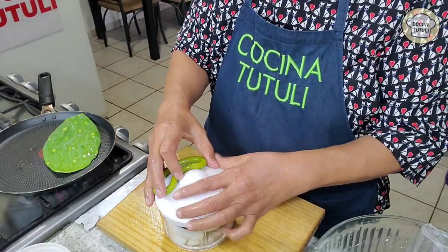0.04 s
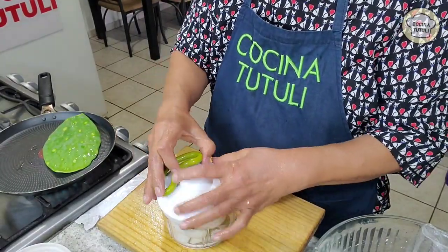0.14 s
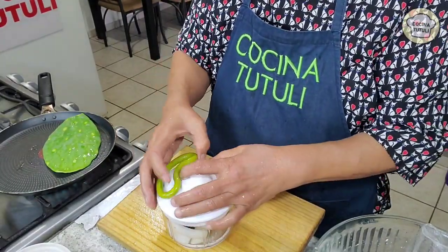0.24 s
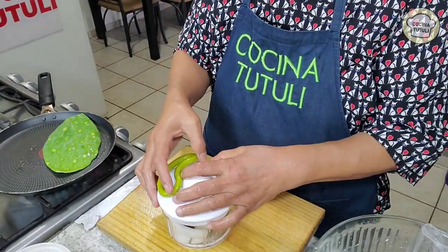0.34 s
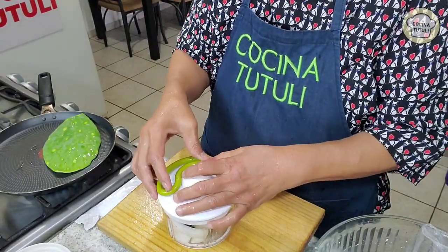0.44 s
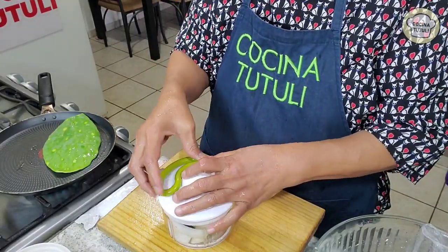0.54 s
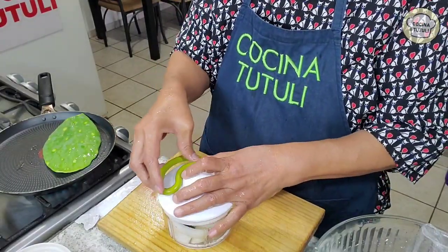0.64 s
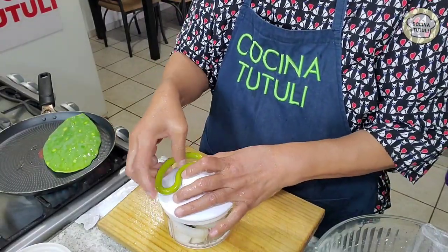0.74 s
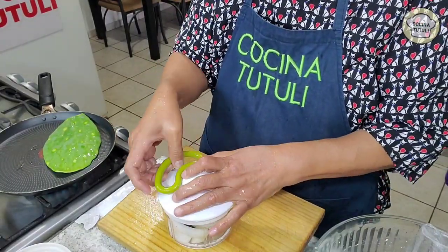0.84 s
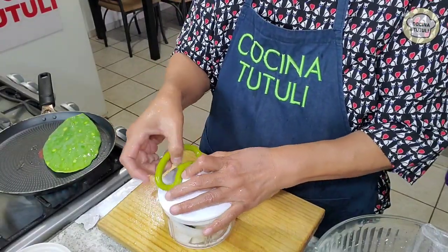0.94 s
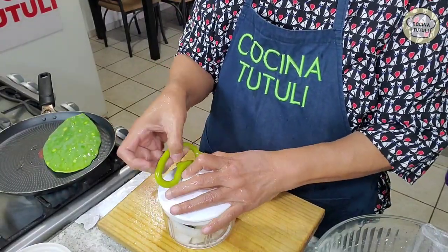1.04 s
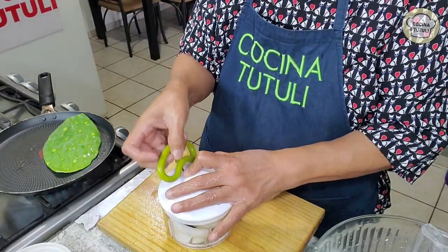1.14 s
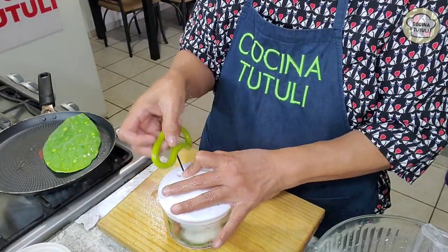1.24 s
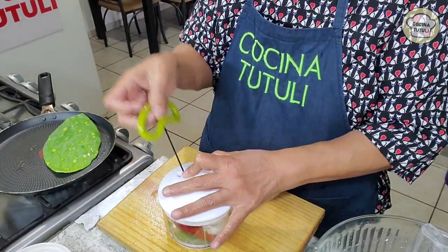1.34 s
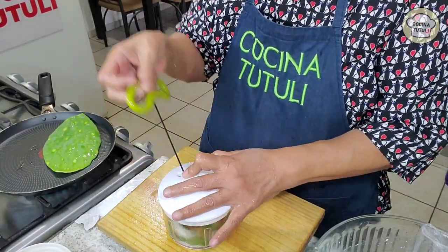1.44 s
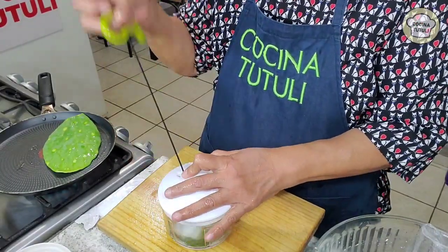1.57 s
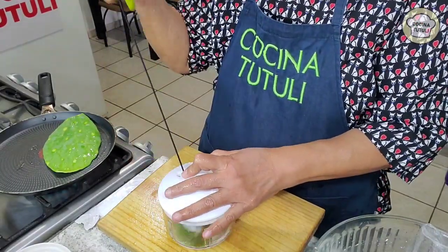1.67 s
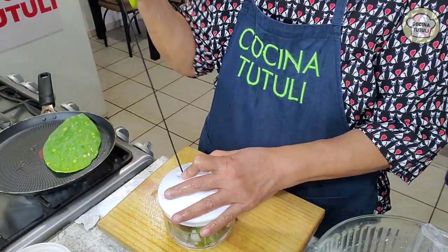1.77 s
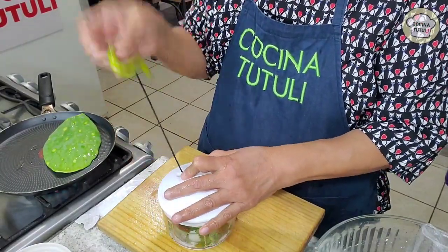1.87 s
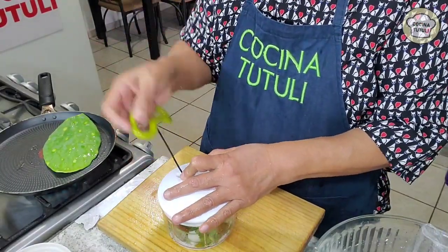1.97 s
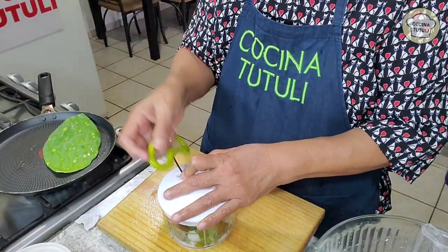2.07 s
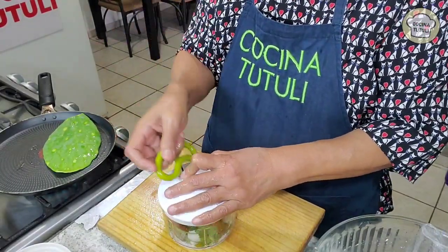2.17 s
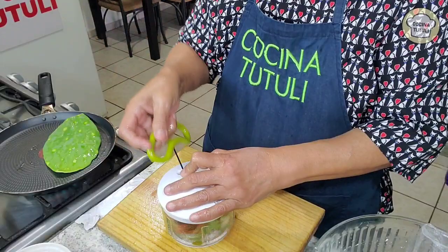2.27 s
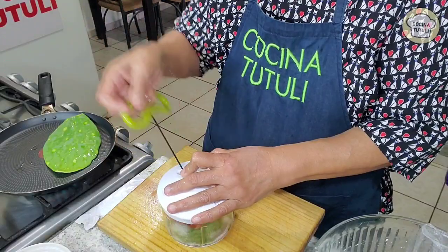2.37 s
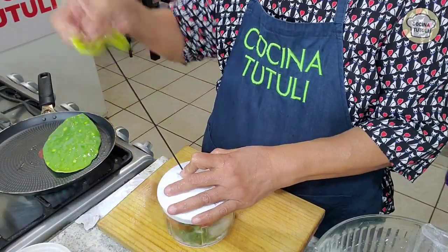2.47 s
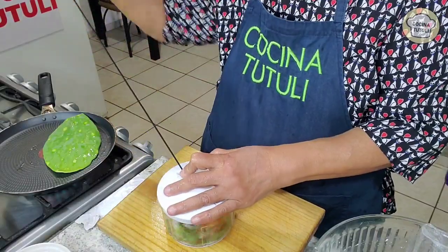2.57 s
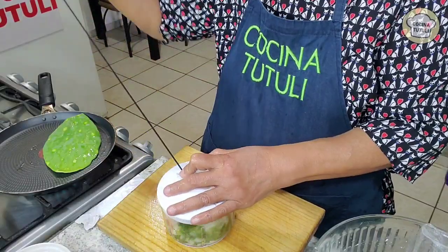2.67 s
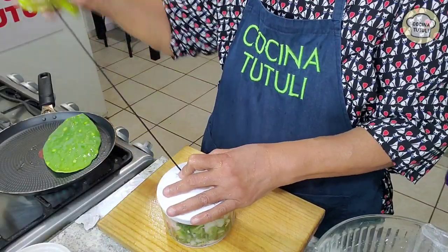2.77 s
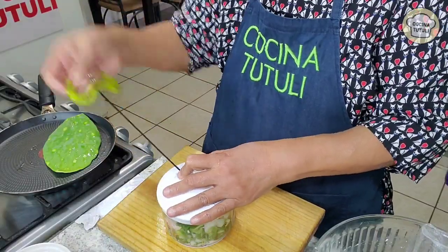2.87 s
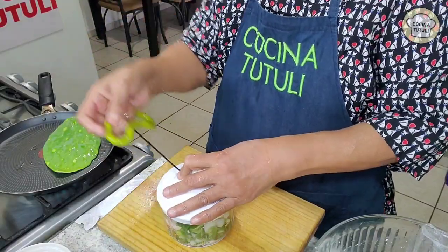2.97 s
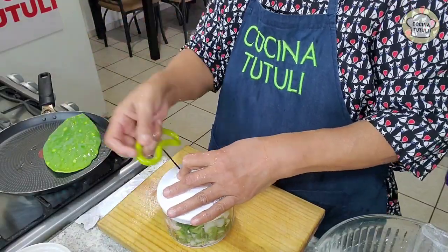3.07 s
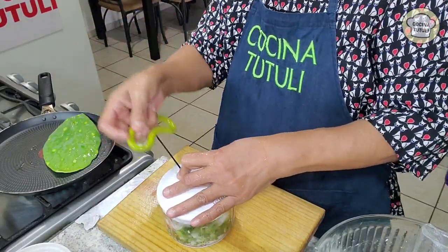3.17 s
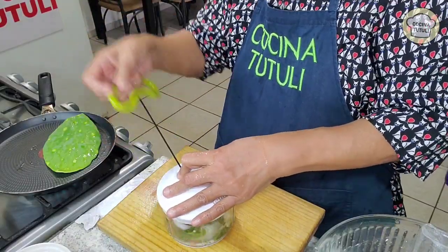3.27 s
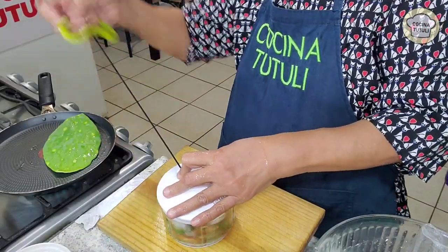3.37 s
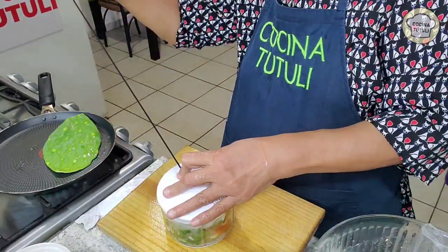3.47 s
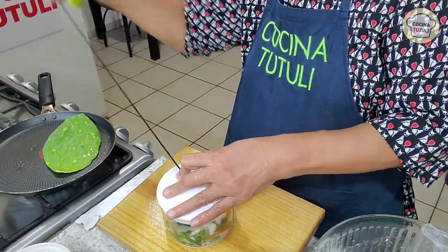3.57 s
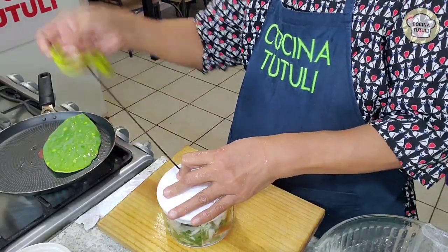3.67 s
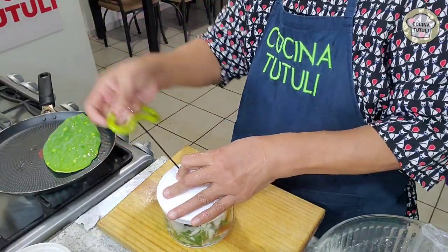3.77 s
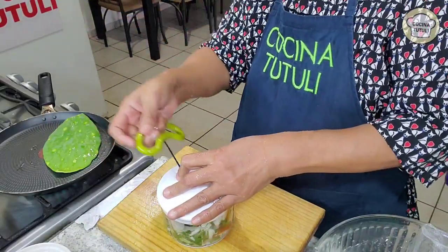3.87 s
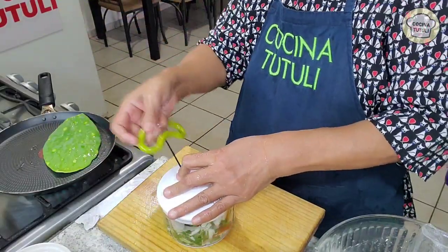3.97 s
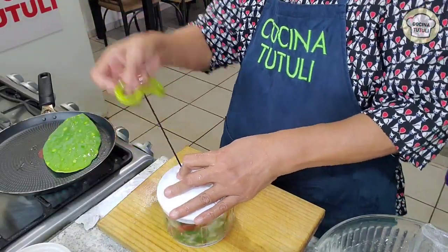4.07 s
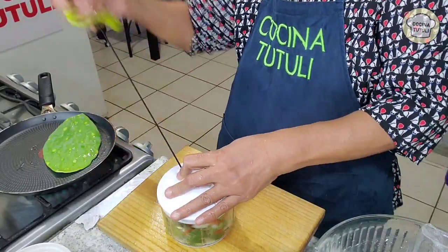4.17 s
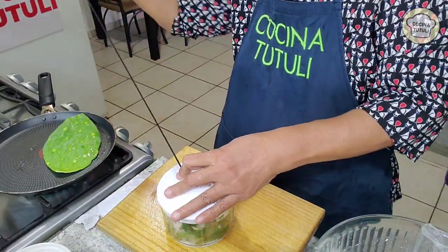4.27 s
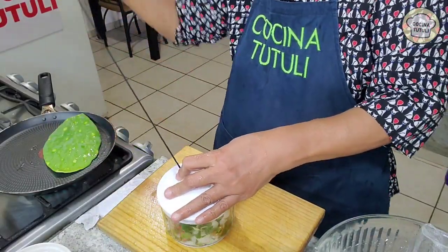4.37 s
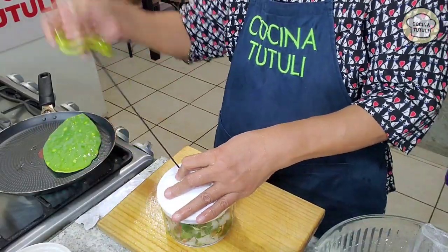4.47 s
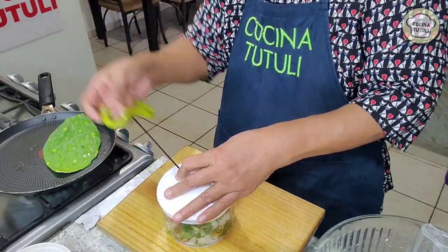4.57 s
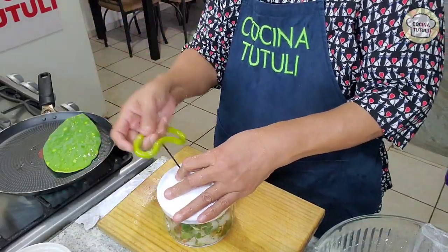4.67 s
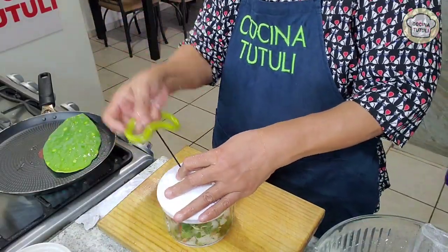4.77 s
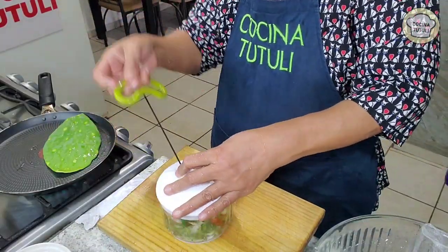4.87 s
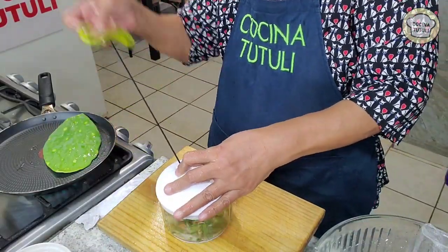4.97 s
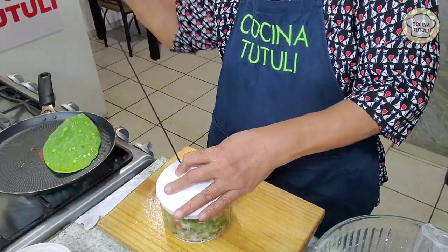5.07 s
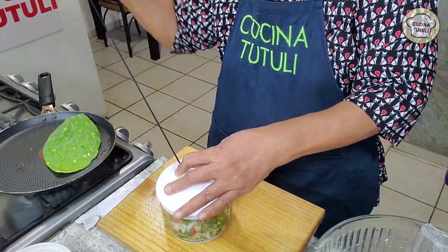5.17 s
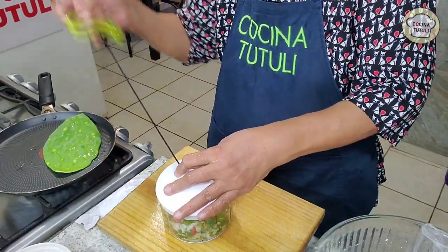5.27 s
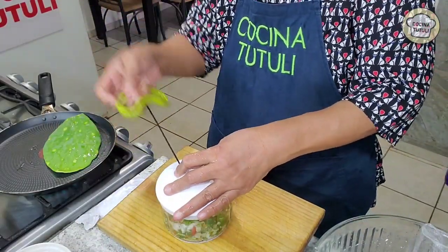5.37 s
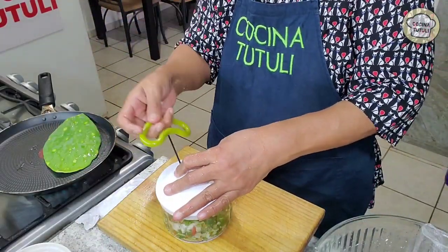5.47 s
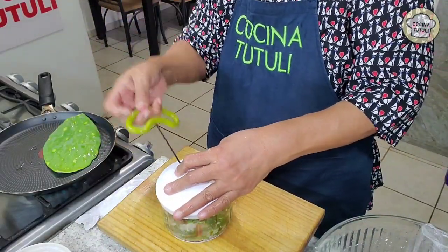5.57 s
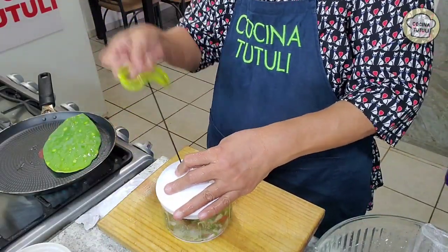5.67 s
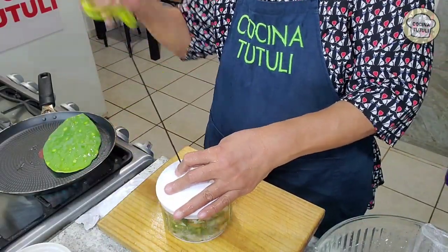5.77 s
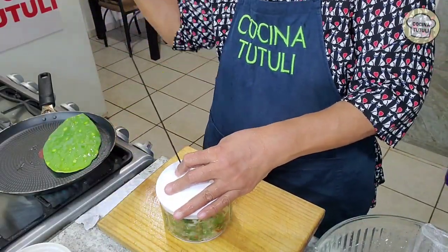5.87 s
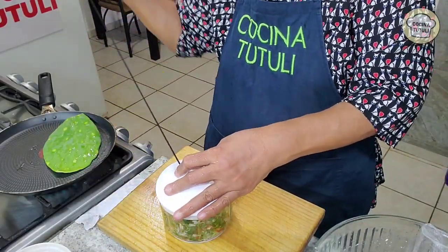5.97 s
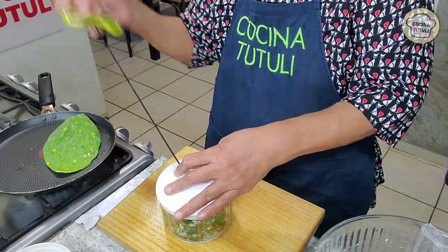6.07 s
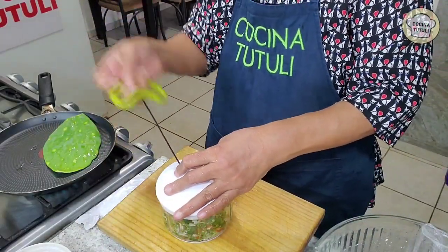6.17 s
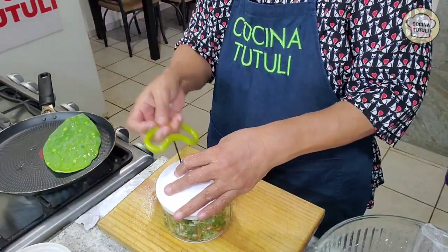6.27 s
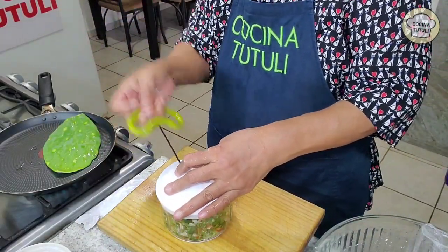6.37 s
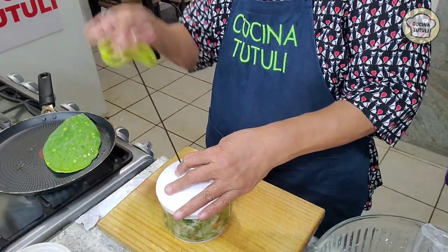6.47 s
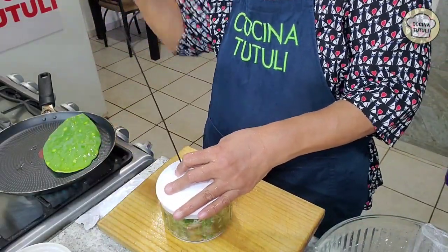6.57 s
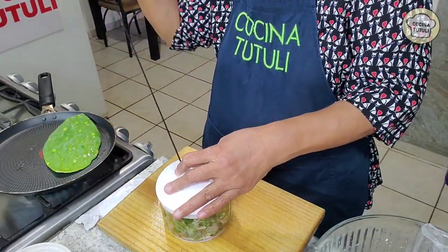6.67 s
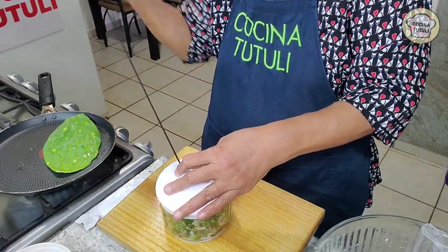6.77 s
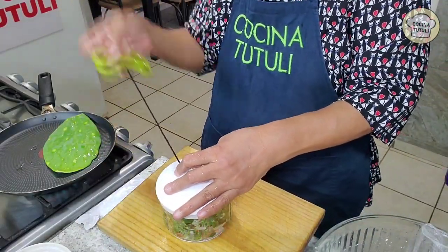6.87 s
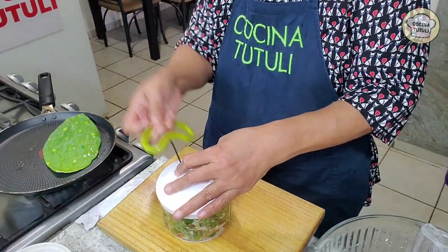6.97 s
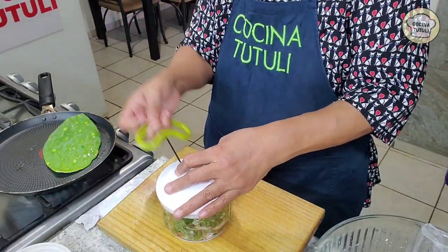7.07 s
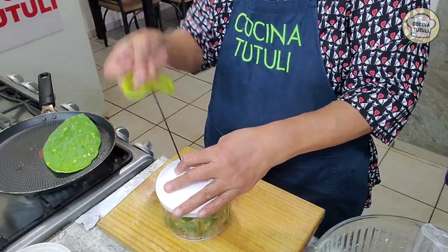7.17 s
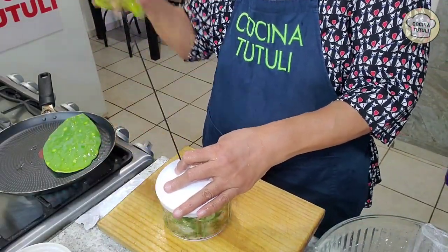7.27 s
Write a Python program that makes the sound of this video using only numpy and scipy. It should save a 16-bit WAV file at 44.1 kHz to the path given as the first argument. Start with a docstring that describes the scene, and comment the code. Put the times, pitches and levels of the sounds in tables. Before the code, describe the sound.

In a small tiled kitchen, a pan sizzles quietly while hands tap a plastic chopper on a wooden board. Then its cord is pulled eight times, about once every 0.8 seconds: a crunchy, whirring chop, a fast ratchety buzz slowing as the cord rewinds, and a hard snap or two. The bowl thumps and shakes on the board. Close stereo microphone, chopper slightly to the left.

```python
"""A pan sizzles softly while a pull-cord food chopper is tapped and bumped on a wooden kitchen board.
Eight pulls of the cord follow: crackling noise and small rings chop, band noise whirrs, the plastic bowl shakes.
On seven returns the pawl rattles over its ratchet, fast and then slower: timed noise bursts and a repeated
click through plastic resonances. Single snaps and a few cord squeaks cut through, over low room noise."""
import sys
import numpy as np
from scipy import signal
from scipy.fft import rfft, irfft, next_fast_len
from scipy.io import wavfile
from scipy.ndimage import uniform_filter1d, map_coordinates

SR = 44100
rng = np.random.default_rng(int(sys.argv[2]) if len(sys.argv) > 2 else 0)


def write(x):
    x = np.atleast_2d(x).T
    wavfile.write(sys.argv[1], SR, np.round(np.clip(x, -1, 1) * 32767).astype(np.int16))


N = 323694
TIME = np.arange(N) / SR
FFT_SIZE = 2 * next_fast_len(N // 2 + SR // 4)
HZ = np.fft.rfftfreq(FFT_SIZE, 1 / SR)
CRAWL_PER_S = 80  # tooth rate the slowing spool sinks towards, before braking

# Levels in the tables are relative: each layer has its own trim.
# returns of the cord: start_s, length_s, full_speed_hold_s, top_clicks_per_s, full_speed_db, crawl_db,
# bowl_db, cavity_hz, wall_hz, wall_db, rim_hz, rim_db, hiss_db
CORD_RETURNS = [(1.792, .287, .11, 207, -26.5, -37.5, -28.5, 886, 2657, 18, 4860, 7.5, -25),
                (2.736, 0.35, .11, 182, -26.5, -37.5, -29, 786, 2560, 5.5, 5100, 6.5, -17),
                (3.574, .333, 0.12, 208, -28, -40.5, -30, 747, 2540, 10, 5600, 2, -17.5),
                (4.401, 0.3, .13, 250, -27.5, -36.5, -30.5, 726, 2480, 11.5, 5220, 6, -14.5),
                (5.219, .295, .12, 240, -28, -40.5, -32, 745, 2450, 9.5, 3500, -2, -17),
                (6.002, 0.3, 0.19, 222, -27.5, -38, -33.5, 710, 2514, 14, 5300, 2.5, -18.5),
                (6.768, 0.25, 0.14, 270, -26.5, -36.5, -31.5, 740, 2430, 10.5, 6340, 0, -16.5)]
# snaps of the pawl as the spool stops and catches: time_s, snap_db, knock_db (on top of snap_db)
PAWL_SNAPS = [(2.085, -13.5, -9), (2.104, -14, 19), (2.132, -15, -3), (3.133, -17.5, -4), (3.145, -16, 5),
              (3.965, -16, 6), (3.987, -12.5, 6), (4.773, -19, -1), (4.784, -13, 6), (5.558, -16.5, 4),
              (5.577, -19.5, -5), (6.364, -14, -7), (6.384, -17.5, -6), (7.084, -13.5, 3), (7.108, -9, 3)]
# resonances of the filled bowl: centre_hz, width_hz, lift_db
BOWL_MODES = [(316, 26, 2), (491, 65, 10), (723, 62, 11.5), (857, 62, 7), (1193, 270, 8), (1540, 40, 9),
              (1950, 130, 9.5), (2550, 230, 6), (3015, 64, 7), (3900, 370, 9)]
# spectrum of hollow plastic knocks: frequency_hz, density_db (per Hz)
HOLLOW_SPECTRUM = [(60, -43), (150, -5), (195, -0.5), (240, -4.5), (320, 4.5), (400, -1.5), (470, -9.5),
                   (800, -24), (2000, -59.5)]
# spectrum of fine hiss in the top octaves: frequency_hz, density_db (per Hz)
HISS_SPECTRUM = [(2000, -9), (5000, -6.5), (7600, -16), (8800, -7.5), (9800, 0), (11200, 2), (12500, 0.5),
                 (14500, -0.5), (15800, -5.5)]


def amp(db):
    """Decibels to gain."""
    return 10 ** (np.asarray(db) / 20)


def unit(x):
    """x at rms 1."""
    return x / np.sqrt(np.mean(x ** 2) + 1e-20)


def along(points, hz=HZ):
    """(Hz, value) points read on a log frequency axis."""
    f, v = np.transpose(points)
    return np.interp(np.log(hz + 1), np.log(f + 1), v)


def wobble(rate):
    """A smooth random curve, rate knots a second."""
    knots = rng.standard_normal(int(N * rate / SR) + 4)
    return map_coordinates(knots, [TIME * rate])


def lifts(resonances):
    """The dB that (Hz, width, dB) resonances add to a spectrum."""
    return sum(db / (1 + (2 * (HZ - hz) / width) ** 2) for hz, width, db in resonances)


def colour(x, db):
    """A causal minimum-phase filter of unit power with the given shape in dB."""
    cepstrum = irfft(np.log(unit(amp(db)) + 1e-6))
    # folding the cepstrum onto positive time makes the filter causal
    fold = 1 + np.sign(FFT_SIZE // 2 - np.arange(FFT_SIZE)) * (np.arange(FFT_SIZE) > 0)
    response = np.exp(rfft(cepstrum * fold))
    return irfft(rfft(x, FFT_SIZE) * response)[..., :N]


def steady(x, window=0.07):
    """x with its slow swells evened out over window seconds, at rms 1."""
    power = uniform_filter1d(np.mean(np.atleast_2d(x) ** 2, axis=0), int(window * SR))
    return unit(x / np.sqrt(np.abs(power) + 1e-3 * power.mean()))


def noise(apart):
    """White noise at two ports; apart is the size of their unshared part."""
    shared, own = rng.standard_normal(N), rng.standard_normal((2, N))
    return unit(shared + apart * own)


def strikes(times, sizes):
    """An impulse of energy size squared at each time."""
    samples = np.clip(np.asarray(times) * SR, 0, N - 1).astype(int)
    return np.bincount(samples, np.square(sizes), N)


def bursts(energy, t60, apart, attack=0.00041):
    """Each energy impulse becomes a burst of noise that rises and dies away (times in s)."""
    t = TIME[:SR // 4]
    fade = (np.exp(-np.log(1000) * t / t60) * (1 - np.exp(-t / attack))) ** 2
    level = np.sqrt(np.abs(signal.fftconvolve(energy, fade)[:N]))
    return level * noise(apart)


def grains(rate, spread_db, t60, apart):
    """A crackle of rms 1: tiny bursts, rate a second, at random times and sizes."""
    draws = rng.random((int(rate * N / SR), 2))
    sizes = amp(spread_db * np.minimum(-np.log(1 - draws[:, 1]), 4))
    return unit(bursts(strikes(draws[:, 0] * N / SR, sizes), t60, apart))


def pings(rate, centre_hz, octaves, spread_db, t60):
    """Little damped rings at random times and pitches, rms 1."""
    when, pitch, size = rng.random((int(rate * N / SR), 3)).T[:, :, None]
    n = np.arange(SR // 64)
    hz = centre_hz * 2 ** (octaves * (pitch - .5))
    gain = amp(spread_db * np.minimum(-np.log(1 - size), np.pi))
    decay = np.exp(-np.log(1000) * n / SR / t60)
    rings = gain * np.sin(2 * np.pi * hz * n / SR) * decay
    positions = (when * N).astype(int) + n
    return unit(np.bincount(positions.ravel(), rings.ravel(), N)[:N])


def effort(pull, steepness, coast=0):
    """The gain of one pull: rise, hold (longer by any coasting) and fall, straight in dB until a final fade-out."""
    range_db = 27  # gained over one rise and lost over one fall at steepness 1
    full, rise, hold, fall = pull[:4]
    below = np.maximum(full - TIME, 0) / rise + np.maximum(TIME - full - hold - coast, 0) / fall
    # the slopes run on to twice the rise and fall, fading to silence over their last quarter
    return amp(-steepness * range_db * np.minimum(below, 2)) * np.clip(2 * (2 - below), 0, 1)


def pulled(order, steepness, coast=0):
    """The gain all pulls give to the layer in column order; a steep layer sounds only near full speed."""
    # pulls of the cord: full_speed_at_s, rise_s, hold_s, fall_s, chopping_db, whirr_db, high_whirr_db,
    # spray_db, board_db, bowl_db
    cord_pulls = [(1.503, 0.5, .16, 0.1, -32.5, -42, -58, -43, -29.5, -31),
                  (2.403, 0.13, 0.09, 0.23, -25.5, -42, -56, -34, -27, -28),
                  (3.323, 0.39, 0.052, 0.34, -30, -34, -50, -35.5, -27.5, -30.5),
                  (4.148, 0.15, 0.067, 0.24, -27.5, -28, -52, -34.5, -25, -29),
                  (4.974, 0.27, 0.097, 0.097, -30.5, -37, -40, -31.5, -33.5, -34),
                  (5.763, 0.28, 0.043, 0.28, -30, -31, -42, -30, -37, -34.5),
                  (6.501, 0.27, 0.044, 0.3, -30.5, -30.5, -35.5, -33, -34, -34.5),
                  (7.24, 0.24, 0.069, 0.18, -30, -32, -34, -31, -37, -33)]
    return sum(amp(pull[order]) * effort(pull, steepness, coast) for pull in cord_pulls)


def rewind(row):
    """One return: the spool spins up, slows to a crawl and brakes; gives times, clicks per second, drive (0 at a crawl)."""
    start_share, spin_up_s, slow_down_s, brake_s = .45, .02, .045, .035
    start, length, hold, top = row[:4]
    t = TIME[TIME < length]
    spin_up = 1 - (1 - start_share) * np.exp(-t / spin_up_s)
    slowing = np.exp(-np.maximum(t - hold, 0) / slow_down_s)
    rate = spin_up * (CRAWL_PER_S + (top - CRAWL_PER_S) * slowing)
    drive = np.log(rate / CRAWL_PER_S) / np.log(top / CRAWL_PER_S)
    braking = 1 - .5 * np.exp((t - length) / brake_s)
    return start + t, rate * braking, drive


def room_tone(air_db=-47):
    """The low, steady rush of the kitchen: shaped noise whose bass is alike at both ports."""
    # spectrum of the room's air: frequency_hz, density_db (per Hz)
    air = [(20, -8), (45, 10.5), (85, -44), (150, 4), (330, 2.5), (580, -12.5), (800, -8.5), (1600, -15),
           (2080, 0), (2500, -13), (3400, -5), (5500, -20.5), (8000, -18), (16000, -38)]
    mid, side = rng.standard_normal((2, N))
    side_db = along([(60, -20), (250, -11), (700, 3.5), (3000, 1)])
    side = irfft(rfft(side, FFT_SIZE) * amp(side_db))[:N]
    return amp(air_db) * unit(colour(np.array([mid + side, mid - side]), along(air)))


def walls(x):
    """The tiled kitchen answers with a noise tail, each frequency dying at its own speed."""
    # reverberation of the room: frequency_hz, t60_s
    decay = [(100, 0.061), (800, 0.33), (4000, 0.76), (14000, 0.017)]
    hz, t, z = signal.stft(rng.standard_normal((2, SR // 2)), SR, nperseg=256)
    fading = z * np.exp(-np.log(1000) * t / along(decay, hz)[:, None])
    tail = signal.istft(fading, SR, nperseg=256)[1]
    delayed = np.pad(tail, ((0, 0), (SR // 200, 0)))  # 5 ms later
    return signal.fftconvolve(x, delayed / np.linalg.norm(tail[0]), axes=1)[:, :N]


def pan(sizzle_db=-0.5, flutter_db=0.5, spit_db=-3):
    """Dense tiny bursts make a fine, high sizzle that swells and sinks, with a louder spit now and then."""
    # course of the sizzle: time_s, level_db
    sizzle = [(0.0, -42.5), (0.2, -42), (1.08, -37.5), (2.21, -43.5), (3.23, -44), (4.0, -43.5),
              (4.31, -40), (4.84, -42), (5.15, -35), (5.48, -35.5), (5.91, -33.5), (6.25, -36),
              (6.79, -31.5), (6.97, -34.5), (7.18, -40.5), (7.34, -33.5)]
    # louder spits of fat: time_s, level_db
    spits = [(0.15, -29), (4.276, -24), (5.578, -23), (6.308, -32), (6.545, -19)]
    fizz = unit(colour(grains(rate=1300, spread_db=3.0, t60=0.033, apart=0.88), along(HISS_SPECTRUM)))
    level = amp(sizzle_db + np.interp(TIME, *np.transpose(sizzle)) + flutter_db * wobble(14))
    s, db = np.transpose(spits)
    spitting = bursts(strikes(s, amp(db + spit_db)), t60=.04, apart=.7)
    return level * fizz + colour(spitting, along(HISS_SPECTRUM))


def shaking(board_db=-3, bowl_db=-3.5, bump_db=19, held_bowl_db=-7, crawl_db=-6, hum_db=-7, held_hum_db=-3,
            coast_s=0.15):
    """The lopsided load and rewinding spool shake the bowl; the board booms and hums on while the blades coast."""
    # pressure of the hands, which keeps the bowl rumbling on the board: time_s, level_db
    pressure = [(0, -44), (.42, -45), (.69, -40.5), (.85, -44.5), (1.12, -48.5), (1.32, -34), (1.9, -36),
                (2.24, -40), (2.7, -38), (3.1, -42), (3.7, -37.5), (3.93, -39), (4.3, -33), (4.74, -41),
                (4.86, -37), (5.5, -40.5), (6.3, -38.5), (7.34, -42.5)]
    # the bowl bumping the board: time_s, level_db
    bumps = [(0.045, -28), (0.236, -32), (1.304, -21), (1.512, -18), (1.745, -26), (2.284, -29),
             (2.375, -22), (3.311, -16), (3.389, -22), (4.126, -13.5), (4.156, -11), (4.222, -23),
             (4.375, -21), (4.81, -20.5), (4.944, -25), (5.049, -22), (5.575, -22.5), (5.76, -21),
             (5.965, -19), (6.374, -19), (6.56, -20), (6.748, -18), (7.071, -21), (7.236, -25)]
    # resonances of the board under the bowl: centre_hz, width_hz, lift_db
    board_modes = [(83.5, 18.6, 18.5), (122.8, 23, 17), (150.8, 9.6, 7.5)]
    # spectrum of the board's boom: frequency_hz, density_db (per Hz)
    thud = [(20, -18), (45, -13.5), (70, -4), (100, -20.5), (165, -4.5), (230, -6), (450, -24), (1200, -44)]
    hands = amp(np.interp(TIME, *np.transpose(pressure)))
    spool = np.zeros(N)
    for row in CORD_RETURNS:
        t, _, drive = rewind(row)
        spool += np.interp(TIME, t, amp(row[6] + crawl_db * (1 - drive)), left=0, right=0)
    board = np.hypot(hands, pulled(order=8, steepness=1.0))
    bowl = np.hypot(amp(held_bowl_db) * hands, pulled(order=9, steepness=0.83) + spool)
    coasting = np.hypot(amp(held_hum_db) * hands, amp(hum_db) * pulled(order=8, steepness=3.0, coast=coast_s))

    thuds = grains(rate=120, spread_db=1.0, t60=0.028, apart=0.24)
    boom = steady(colour(thuds, along(thud) + lifts(board_modes)))
    hum = np.zeros(N)
    for hz, width, db in board_modes:
        wavering_hz = hz + width / 4 * wobble(20)
        hum += amp(db) * np.sin(2 * np.pi * np.cumsum(wavering_hz) / SR)
    hum = unit(hum)
    knocks = grains(rate=160, spread_db=-1.0, t60=0.0073, apart=0.054)
    hollow = steady(colour(knocks, along(HOLLOW_SPECTRUM)))

    s, db = np.transpose(bumps)
    push = np.sqrt(strikes(s, amp(db + bump_db)))
    bump_shape = along([(30, -17), (80, 4), (150, 10.0), (230, -16.5), (320, 6), (500, -30), (1500, -64)])
    bump = colour(push, bump_shape + 0.24 * lifts(board_modes))
    humming = coasting * hum * amp(3.8 * wobble(16))
    return amp(board_db) * board * boom + humming + amp(bowl_db) * hollow * bowl + bump


def taps(tap_db=-6, ring_db=-8, knock_db=-17, tick_db=3):
    """Hard little contacts: a noise crack, a short plastic sine ring, a hollow knock and a bright tick."""
    # taps of handle and lid, and large pieces striking the wall:
    # time_s, tap_db, ring_hz, knock_db (on top of tap_db), tick_db
    contacts = [(0.223, -17.5, 2250, 10, -37), (0.387, -15, 3130, -27, -32), (0.452, -26, 2170, 0, -48),
                (0.696, -22.5, 2060, -5, -34), (0.874, -23.5, 3520, 2, -26), (0.939, -26, 1210, -14, -34),
                (1.169, -30, 2300, 20, -51), (1.209, -24, 1230, 8, -42), (1.304, -18.5, 1280, 12, -43),
                (1.318, -19.5, 2500, 3, -46.5), (1.357, -23, 910, 6, -49), (1.513, -16.5, 3180, 9, -34),
                (1.586, -12.5, 2610, -6, -44), (1.6, -21, 1500, 9, -45), (1.647, -14.5, 2660, 6, -48),
                (1.746, -25.5, 1230, 16.5, -47), (2.285, -30.5, 700, 29, -44), (2.354, -18, 2980, -5, -37),
                (2.374, -13, 1840, 4, -39), (4.019, -21.5, 1530, 22, -46), (4.057, -21, 1650, 12, -33),
                (4.125, -14, 1410, 5, -38), (4.135, -21, 1450, 12, -40), (4.160, -12, 1450, 1, -42),
                (4.376, -21.5, 1300, 13, -35), (5.72, -17.5, 3070, -4, -35), (5.908, -21.5, 2190, 1, -30),
                (5.967, -23.5, 1250, 7, -31), (7.177, -18.5, 2080, 1, -26)]
    # spectrum of the crack: frequency_hz, density_db (per Hz)
    crack_spectrum = [(60, -24), (300, 13), (600, -6), (1200, 2), (3200, 3), (5000, -7), (7600, -13.5),
                      (10000, -27), (16000, -22)]
    s, db, _, knock, top = np.transpose(contacts)
    crack = bursts(strikes(s, amp(db + tap_db)), t60=0.029, apart=0.94)
    crack = colour(crack, along(crack_spectrum) + .5 * lifts(BOWL_MODES))
    body = bursts(strikes(s, amp(db + knock + knock_db)), t60=0.029, apart=0.14)
    body = colour(body, along(HOLLOW_SPECTRUM))
    tick = bursts(strikes(s, amp(top + tick_db)), t60=0.043, apart=0.94)
    tick = colour(tick, along(HISS_SPECTRUM))
    ring, t = np.zeros(N + SR), TIME[:SR // 16]
    # the hand on the lid damps the plastic quickly: 60 dB in 18 ms
    damping = amp(-60 * t / .018)
    for start, peak_db, hz, *_ in contacts:
        ring[int(start * SR):][:len(t)] += amp(peak_db + ring_db) * np.sin(2 * np.pi * hz * t) * damping
    return crack + body + tick + ring[:N]


def squeaks(waver_hz=90, rough_db=3):
    """The cord rubs in its eyelet: each squeak is one rough, wavering sine that glides."""
    # squeaks of the cord: start_s, length_s, from_hz, to_hz, level_db
    glides = [(1.098, 0.27, 2220, 2190, -49), (7.09, 0.069, 2640, 2580, -36),
              (7.167, .035, 2180, 1940, -33), (7.256, .08, 1750, 2010, -38)]
    out = np.zeros(N)
    for start, length, from_hz, to_hz, db in glides:
        part = np.clip((TIME - start) / length, 0, 1)
        hz = from_hz + (to_hz - from_hz) * part + waver_hz * wobble(400)
        swell = np.sqrt(8 * part * (1 - part))
        out += amp(db) * swell * np.sin(2 * np.pi * np.cumsum(hz) / SR)
    return out * amp(rough_db * wobble(130))


def blades(chop_db=-1.5, piece_db=-7, whirr_db=-1.5, spray_db=-1, throb_db=-3.1):
    """Blades crunch, fling pieces and spray juice at the wall (bursts and rings); the spindle whirrs in band noise."""
    # spectrum of the crunch: frequency_hz, density_db (per Hz)
    chop_spectrum = [(60, -29), (300, -4.5), (570, -7.5), (780, -8), (1000, -13), (1300, -8.5),
                     (2200, -2.5), (3500, -6.5), (4800, -10), (6200, -15.5), (7600, -24.5), (10000, -20),
                     (16000, -56)]
    crackle = grains(rate=800, spread_db=2.8, t60=.018, apart=.8)
    crunch = crackle * amp(throb_db * wobble(45))
    chop = steady(colour(crunch, along(chop_spectrum) + lifts(BOWL_MODES)))
    flung = pings(rate=650, centre_hz=1400, octaves=3, spread_db=3.6, t60=.018)
    pieces = steady(colour(flung, lifts(BOWL_MODES)))
    droplets = grains(rate=4500, spread_db=4.5, t60=.012, apart=0.53)
    spray = unit(colour(droplets, along(HISS_SPECTRUM)))

    lower_band = along([(700, -32), (1250, -11.5), (1480, 11), (1680, -7), (2600, -21.5)])
    upper_band = along([(1200, -25), (1750, 2), (2100, 5), (3000, -35)])
    lower = steady(colour(noise(apart=1.0), lower_band), window=0.06)
    upper = steady(colour(noise(apart=0.97), upper_band), window=0.018)
    # a higher band joins the whirr only when the spindle runs fastest
    whirr = pulled(order=5, steepness=2.6) * lower + pulled(order=6, steepness=5.4) * upper
    chopping = pulled(order=4, steepness=0.89) * (amp(chop_db) * chop + amp(piece_db) * pieces)
    spraying = amp(spray_db) * pulled(order=7, steepness=0.68) * spray
    return chopping + amp(whirr_db + 1.7 * wobble(60)) * whirr + spraying


def snaps(knock_db=-15):
    """Each single snap of the pawl also knocks the hollow lid: a very short, dull burst."""
    s, db, knock = np.transpose(PAWL_SNAPS)
    thump = bursts(strikes(s, amp(db + knock + knock_db)), t60=0.0035, apart=0.18)
    return colour(thump, along([(80, -18), (200, 9), (350, -6.0), (600, -16), (1500, -25)]))


def teeth(row, click_db=26, scatter_db=0.95, jitter=0.00031, slack_db=1, take_up=0.0048):
    """The pawl drops over one tooth after another, louder the faster the spool turns."""
    t, rate, drive = rewind(row)
    full_db, crawl_db = row[4:6]
    passed = np.cumsum(rate) / SR
    times = np.interp(np.arange(int(passed[-1]) + 1), passed, t)
    chance = rng.standard_normal((128, 2))[:len(times)]
    db = crawl_db + (full_db - crawl_db) * np.interp(times, t, drive) + click_db + scatter_db * chance[:, 0]
    # the first teeth are soft while the spring takes up the slack
    db = db - slack_db * np.exp(-(times - t[0]) / take_up)
    # dividing by the rate keeps dense clicks from adding up louder
    density = np.maximum(np.interp(times, t, rate), CRAWL_PER_S)
    return strikes(times + jitter * chance[:, 1], 2 * amp(db) / np.sqrt(density))


def ratchet(snap_db=-5, cavity_db=9, cavity_width=130, wall_width=240, rim_width=900, buzz_db=-5, hiss_db=4,
            slow_rim_db=-5):
    """The spring rewinds the cord: clicks through plastic resonances buzz fast, then slow to single snaps."""
    # spectrum of the pawl's clicks: frequency_hz, density_db (per Hz)
    pawl = [(40, -19), (150, -15), (380, 3), (570, -12), (800, -0.5), (1020, -11.5), (1300, -8.5),
            (2500, -4.5), (3450, -7), (5400, -6.5), (6300, -12.5), (7600, -17.5), (10000, -15.5),
            (16000, -17)]
    # resonances of the plastic lid and gear housing: centre_hz, width_hz, lift_db
    lid = [(360, 80, -1.5), (527, 34, 13), (1160, 300, 5), (1461, 57, 10), (1738, 21, 9.5), (1954, 91, 11),
           (2060, 110, 4), (2234, 38, 5.5), (3160, 62, 7), (4020, 375, 14.5), (4900, 180, 1),
           (5470, 210, 7)]
    # spectrum of the rim struck by a slow tooth: frequency_hz, density_db (per Hz)
    rim_spectrum = [(2500, -42), (4200, -16), (4900, 5), (5600, 8), (6100, -32), (8000, -34)]
    hiss_fade_s = 0.086
    s, db, _ = np.transpose(PAWL_SNAPS)
    rattle, hiss, slow, t = np.zeros((2, N)), np.zeros(N), np.zeros(N), TIME[:SR // 64]
    for row in CORD_RETURNS:
        start, length, *_, cavity, wall, wall_db, rim, rim_db, top_db = row
        own = np.abs(s - start - length) < 1 / 3  # snaps near the end of this return
        running = teeth(row)
        energy = running + strikes(s[own], amp(db[own] + snap_db))
        # part of every click is the same, which turns the fast rattle into a buzz
        click = rng.standard_normal(len(t)) * amp(-60 * t / 0.016) * (1 - np.exp(-t / 0.00028))
        buzz = amp(buzz_db) * signal.oaconvolve(np.sqrt(energy), click)[:N]
        clatter = bursts(energy, t60=0.034, apart=0.94, attack=0.00079)
        rings = [(cavity, cavity_width, cavity_db), (wall, wall_width, wall_db), (rim, rim_width, rim_db)]
        rattle += colour(buzz + clatter, along(pawl) + lifts([*lid, *rings]))
        # a bright hiss favours the hardest clicks and is strongest as the spring lets go
        fade = np.exp(-np.maximum(TIME - start, 0) / hiss_fade_s)
        hardness = np.sqrt(running / running.max())
        hiss += running * fade * hardness * amp(top_db + hiss_db) ** 2
        # slow teeth drop fully and ring the rim
        times, _, drive = rewind(row)
        slowness = np.interp(TIME, times, np.clip(1 - drive, 0, 1))
        slow += running * slowness * (TIME > start + row[2])
    rim_ring = colour(bursts(slow, t60=0.012, apart=1.0, attack=0.00062), along(rim_spectrum))
    fine_hiss = colour(bursts(hiss, t60=0.11, apart=0.25, attack=0.00024), along(HISS_SPECTRUM))
    return rattle + amp(slow_rim_db) * rim_ring + fine_hiss


def patchy(x, depth_db=2.36):
    """The colour of x flickers, in patches a few hundred Hz wide."""
    z = signal.stft(x, nperseg=512)[2]
    field = uniform_filter1d(rng.standard_normal(z.shape[1:]), size=3, axis=0)  # across frequency
    field = uniform_filter1d(field, size=8, axis=1)  # across time
    return signal.istft(z * amp(depth_db * unit(field)), nperseg=512)[1][:, :N]


def scene(wet_db=-16):
    """The chopper stands nearer the left port; its hollow knocks reach both ports nearly alike."""
    # phase by which the left port leads the right: frequency_hz, lead_radians
    phase_lead = [(0, 2), (420, -3), (520, -2), (750, -4.5), (950, -4.5), (1550, -6), (1850, -9),
                  (2250, -13.5), (2450, -9.5), (7300, 10.5), (9000, 13)]
    near = patchy(ratchet()) + blades() + squeaks() + taps()
    lead = np.interp(HZ, *np.transpose(phase_lead))
    turn = np.exp(1j * np.outer([.5, -.5], lead))
    chopper = irfft(rfft(near, FFT_SIZE) * turn)[:, :N]
    return chopper + amp(wet_db) * walls(chopper) + snaps() + shaking() + pan() + room_tone()


def record(dry):
    """Each port has its own colour; nothing passes above the band limit."""
    # level at the left microphone port over the right: frequency_hz, left_over_right_db
    lean = [(100, 1), (350, 2), (490, -1), (640, 11.5), (800, 12), (1050, 10), (1500, 4.5), (2050, 2.5),
            (2600, 4.5), (4000, 6), (5000, 5), (6300, 9), (7700, 7.5), (9200, 2.5), (10500, -7),
            (14000, -1)]
    top_hz = 16000
    ports = amp(np.outer([.5, -.5], along(lean)))
    return irfft(rfft(dry, FFT_SIZE) * ports * (HZ < top_hz))[:, :N]


dry = scene()
out = record(dry)
write(out)
```